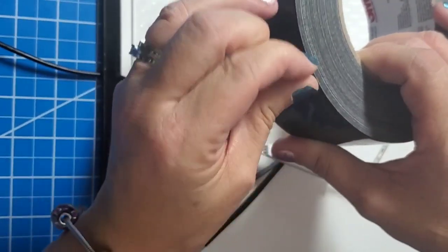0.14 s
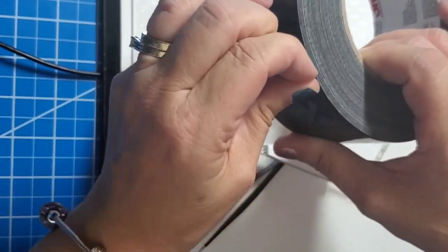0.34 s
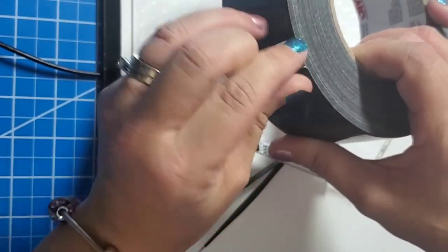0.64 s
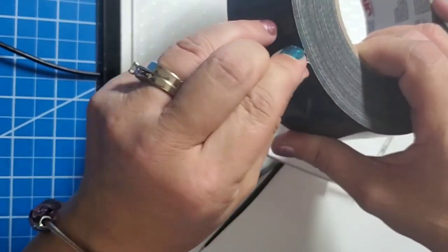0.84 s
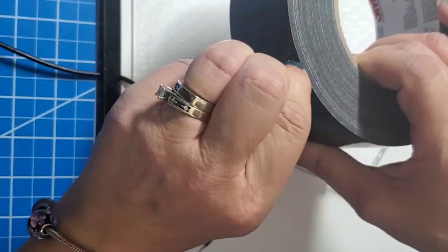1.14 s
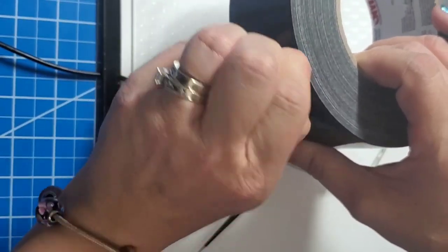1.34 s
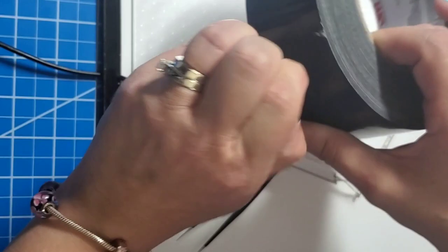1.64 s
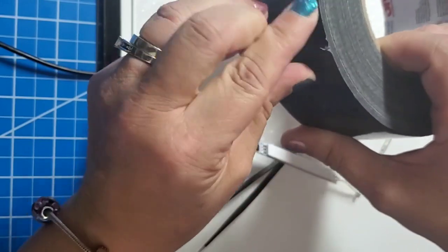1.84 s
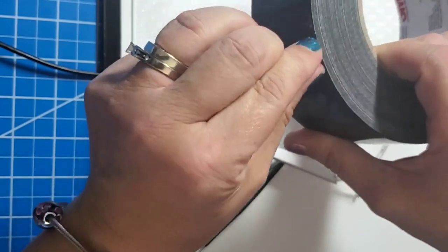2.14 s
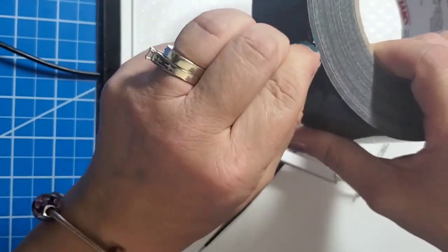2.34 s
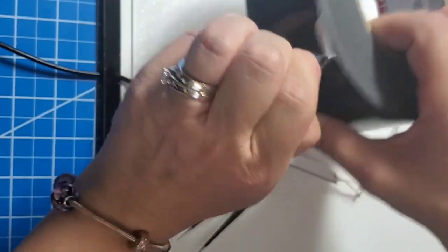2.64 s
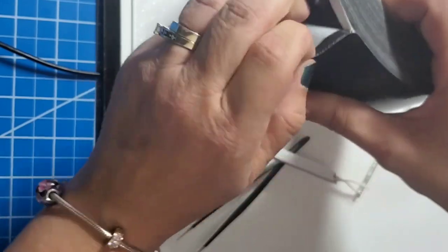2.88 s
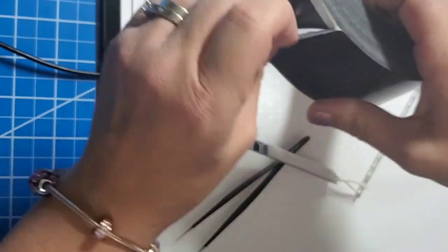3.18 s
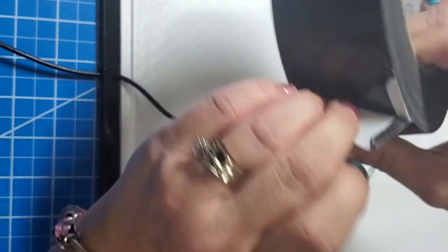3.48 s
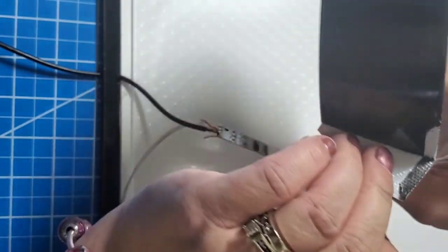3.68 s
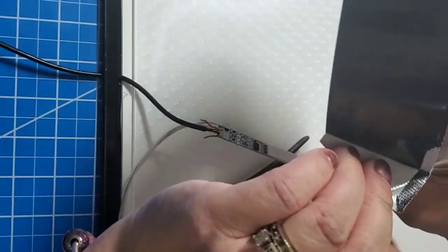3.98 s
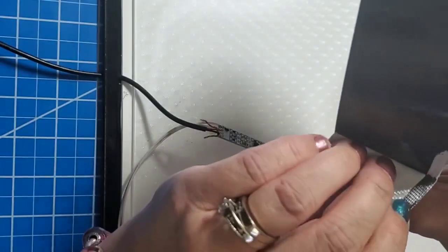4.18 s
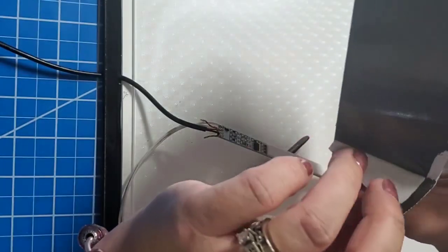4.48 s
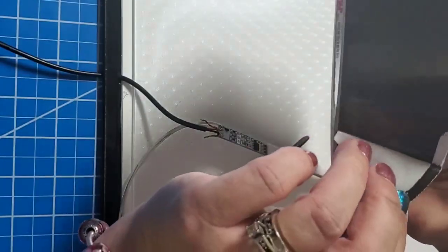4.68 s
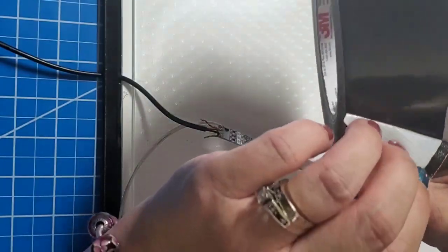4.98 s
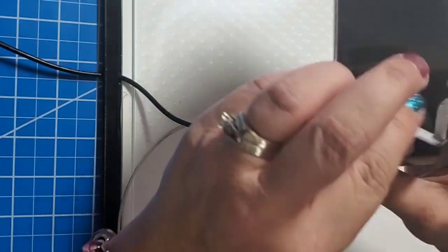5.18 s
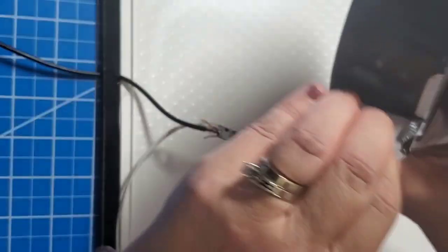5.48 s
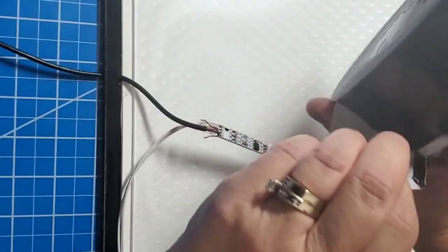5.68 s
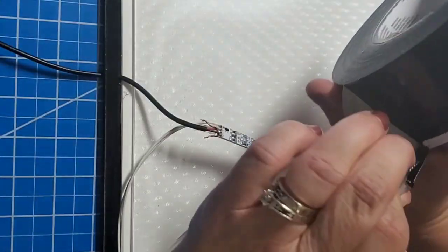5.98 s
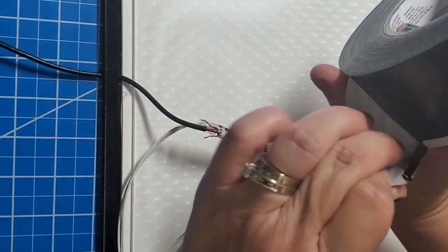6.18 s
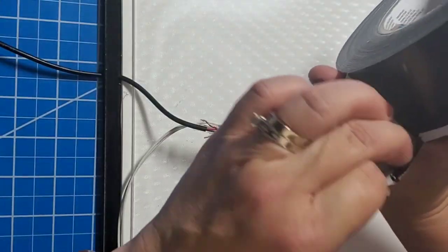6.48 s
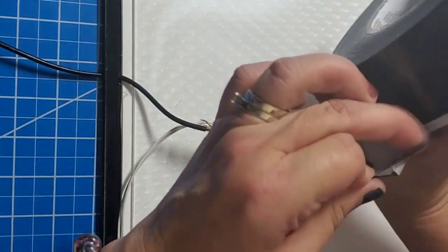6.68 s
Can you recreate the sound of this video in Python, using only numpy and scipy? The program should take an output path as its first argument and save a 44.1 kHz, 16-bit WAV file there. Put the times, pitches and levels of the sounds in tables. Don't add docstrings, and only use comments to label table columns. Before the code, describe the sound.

A small quiet room, heard close up, with soft air noise and a very faint far motor hum. At 0.1 s skin touches the tape backing with a light hiss, then a slow, almost inaudible rub. Around 1.6 s there is a quick swipe with tiny nail ticks and a dull desk bump. From 2.55 s picking clicks grow into a short crackling tear at 2.7 to 2.8 s. Then it is nearly quiet: faint brushes, a very soft run of glue ticks at 3.6 to 4.1 s, small clicks at 4.2 and 4.5 s, low hand bumps. Light picks from 5.1 s lead to the loud bright rip at 5.48 to 5.55 s. A weak creak at 5.7 s, a hard snap at 5.87 to 5.91 s and a small tug at 6.0 s follow. Sharp tugs crack at 6.3, 6.54 and 6.75 s, each with a brief room tail.

```python
import sys
import numpy as np
from scipy import signal
from scipy.io import wavfile
from scipy.ndimage import map_coordinates

SR = 44100
rng = np.random.default_rng(int(sys.argv[2]) if len(sys.argv) > 2 else 0)


def output_pcm(signal):
    pcm = np.clip(np.atleast_2d(signal).T, -1, 1) * 32767
    wavfile.write(sys.argv[1], SR, np.round(pcm).astype(np.int16))


def level_to_linear(level):
    exponent = np.asarray(level, float) / 20
    return 10 ** exponent


N = 300938


def rms_one(x):
    return x / np.sqrt(np.mean(x ** 2) + 1e-20)


def in_time(spans, fade_s):
    t = np.arange(N) / SR
    s, level_db, *columns = np.transpose(np.concatenate(spans))
    gate = 0
    for rows in spans:
        to_edge_s = np.minimum(t - rows[0][0], rows[-1][0] - t)
        gate = gate + np.clip(to_edge_s / fade_s, 0, 1)
    return [gate * level_to_linear(np.interp(t, s, level_db))] + [np.interp(t, s, c) for c in columns]


def at_hz(points, hz):
    table_hz, values = np.transpose(points)
    return np.interp(np.log(hz), np.log(np.maximum(table_hz, 1)), values)


def drift(rate_hz):
    knots = rng.standard_normal(int(N / SR * rate_hz * 2) + 3)
    return map_coordinates(knots, [np.linspace(0, len(knots) - 1, N)], order=3)


def band(x, low_hz, high_hz):
    sos = signal.butter(2, [low_hz, min(high_hz, 0.45 * SR)], "band", fs=SR, output="sos")
    return signal.sosfilt(sos, x)


def resonance(x, hz, width_hz):
    r = np.exp(-np.pi * width_hz / SR)
    poles = [1, -2 * r * np.cos(2 * np.pi * hz / SR), r * r]
    return signal.lfilter([(1 - r * r) / 2, 0, (r * r - 1) / 2], poles, x)


def body(x, modes, low_hz, high_hz, broad_db):
    click = np.arange(4096) == 0
    response = level_to_linear(broad_db) * click
    for hz, width_hz, level_db in modes:
        response = response + level_to_linear(level_db) * resonance(click, hz, width_hz)
    response = band(band(response, low_hz, high_hz), low_hz, high_hz)
    unit_energy = rms_one(response) / 64
    return signal.oaconvolve(x, unit_energy[None], axes=-1)[:, :N]


def releases(per_s, spread_db, alike):
    sizes_db = spread_db * np.minimum(rng.exponential(1, (4, N)), 4)
    sizes = level_to_linear(sizes_db) * rng.choice([-1, 1], (4, N))
    shared, *own = sizes * (rng.random((4, N)) < per_s / SR)
    alike = np.clip(alike, 0, 1)
    return rms_one(np.sqrt(alike) * shared + np.sqrt(1 - alike) * np.array(own))


def floor():
    # frequency in Hz, level in dB per Hz.
    spectrum = [(20, -26), (45, -17.5), (90, -11.5), (150, -14.5), (190, -18.5), (300, -25.5), (500, -29),
                (900, -38), (1500, -37), (3000, -39.5), (4700, -41.5), (6500, -50.5), (10500, -43.5),
                (15500, -52)]
    # frequency in Hz, left-right likeness from 0 to 1.
    likeness = [(60, 0.38), (250, 0.67), (700, 0.7), (2000, 0.046), (8000, 0.039)]
    # frequency in Hz, left minus right in dB.
    leaning = [(60, 6.5), (380, 0.5), (2380, -1), (15000, -0.5)]
    # time in seconds, level in dB.
    swell = [(.6, 4), (.9, -2.5), (1.3, 5), (1.699, -0.5), (2.3, -1), (3.301, 0.5), (3.8, -4), (4.4, 1.5),
             (5, -2), (6.2, -2)]
    out, edges_hz = 0, 22 * 2 ** np.arange(0, 9.8, 0.5)
    white = rng.standard_normal((2, 2, N))
    swell_db = np.interp(np.arange(N) / SR, *np.transpose(swell))
    for k, (low_hz, high_hz) in enumerate(zip(edges_hz, edges_hz[1:])):
        mid, side = band(white[k % 2], low_hz, high_hz)
        hz = np.sqrt(low_hz * high_hz)
        alike = np.clip(at_hz(likeness, hz), -1, 1)
        lean = level_to_linear(at_hz(leaning, hz) / 2 * np.array([[1], [-1]]))
        gain = level_to_linear(at_hz(spectrum, hz) + swell_db * (250 < hz < 2000))
        pair = np.sqrt(1 + alike) * mid + np.sqrt(1 - alike) * side * [[1], [-1]]
        out = out + gain * lean * pair
    return level_to_linear(-64 - 9.5) * rms_one(out)


def hum():
    # frequency in Hz, level in dB rms.
    lines = [(75.4, -74), (123.8, -76.5), (150.7, -75), (197, -88), (270, -90)]
    t, out = np.arange(N) / SR, 0
    for hz, db in lines:
        waver_db = 2 * drift(3)
        tone = np.sin(2 * np.pi * (hz * t + rng.random()))
        out = out + np.sqrt(2) * level_to_linear(db + waver_db) * tone
    return out


def bumps():
    # centre in seconds, level in dB, half length in seconds.
    shifts = [(0.197, -66.5, 0.064), (0.925, -73, 0.089), (1.249, -64, 0.09), (1.71, -59, 0.03),
              (2.326, -63, 0.078), (2.792, -62.5, 0.037), (3.05, -70, 0.26), (3.95, -75.5, .1),
              (3.48, -70, .07), (4.359, -71, .06), (4.75, -63.5, 0.041), (5.113, -62.5, 0.084),
              (5.28, -70.5, 0.081), (5.55, -65, .07), (6.29, -67, 0.093), (6.604, -63.5, 0.15)]
    t, gain = np.arange(N) / SR, 0
    for s, db, half_s in shifts:
        gain = gain + level_to_linear(db) * np.exp(-((t - s) / half_s) ** 2)
    mode_hz = 61 + 2.0 * drift(4.9)
    mode = level_to_linear(1.5 + 1.4 * drift(6.8)) * np.sin(2 * np.pi * np.cumsum(mode_hz) / SR)
    rumble = rms_one(band(band(rng.standard_normal(N), 36, 160), 36, 160))
    return gain * (mode + level_to_linear(-5.5) * rumble)


def room(x):
    # band centre in Hz, t60 in seconds, level in dB.
    decay = [(545, 0.22, -14.5), (1060, 0.18, -11), (2200, 0.17, -9), (4500, 0.18, -10), (8300, 0.2, -15.5),
             (13000, 0.16, -11.5)]
    t = np.arange(int(0.4 * SR)) / SR
    white, tail = rng.standard_normal((2, 2, len(t))), 0
    for k, (hz, t60_s, level_db) in enumerate(decay):
        dying = band(white[k % 2], hz / 1.34, hz * 1.42) * level_to_linear(-60 * t / t60_s)
        tail = tail + level_to_linear(level_db - 20) * dying
    tail = tail * np.clip((t - 0.002) / 0.0064, 0, 1)
    return signal.oaconvolve(x[None], tail, axes=-1)[:, :N]


def rubbing():
    # start in seconds, rise in seconds, fall in seconds, top level in dB, brightness in relative dB.
    strokes = [
        (0.123, 0.013, 0.13, -71, 4.5),
        (.45, 0.46, .75, -79, 1),
        (1.614, 0.013, 0.18, -67.5, 2),
        (1.78, 0.15, 0.19, -76.5, 6.5),
        (2.52, 0.079, 0.25, -73, 6.5),
        (2.99, 0.0087, 0.13, -78, 3.5),
        (3.1, .01, 0.22, -83.5, 10),
        (3.62, 0.34, 0.32, -82.5, 12),
        (4.19, 0.016, 0.43, -86, 7),
        (5.081, 0.1, 0.24, -90, 16.5),
    ]
    t, gain, bright = np.arange(0, N, 32) / SR, 0, 0
    for s, rise_s, fall_s, top_db, bright_db in strokes:
        share = np.interp(t, [s, s + rise_s, s + rise_s + fall_s], [0, 1, 0])
        stroke = np.minimum(8 * share, 1) * level_to_linear(top_db - 15 * (1.5 - share))
        gain = gain + stroke
        bright = bright + stroke * level_to_linear(bright_db)
    gain, bright = (np.interp(np.arange(N) / SR, t, slow) for slow in (gain, bright))
    hiss = releases(per_s=2800, spread_db=2.5, alike=0.4) * level_to_linear(-0.5 + 1.2 * drift(36))
    grains = hiss + level_to_linear(-24) * releases(per_s=150, spread_db=2.5, alike=0.58)
    return np.array([grains * gain, grains * gain * level_to_linear(-25), grains * gain * level_to_linear(-10), grains * bright])


def peeling():
    # time in seconds, level in dB.
    pulls = [
        [(2.69, -44.5), (2.717, -31), (2.745, -26.5), (2.8, -49.5)],
        [(5.484, -31.5), (5.528, -27.5), (5.55, -35.5)],
        [(5.72, -42.5), (5.73, -50), (5.79, -63)],
        [(5.812, -79), (5.86, -56), (5.865, -34)],
        [(5.873, -38), (5.883, -38.5), (5.92, -46)],
        [(5.985, -64), (6.017, -40), (6.04, -77.5)],
        [(6.313, -37), (6.345, -38)],
        [(6.752, -28), (6.76, -48), (6.79, -36.5)],
    ]
    # roll core, flap, fibre crack, all in relative dB.
    grips = [(-15, -6, 2.5), (-8, -6.5, 2), (1.5, 3, -0.5), (-1, -9.5, 0), (-5, -18, 3), (-3, -9.5, -5.5),
             (-14, -8, 4), (-7, -4.5, -6)]
    core_follows, flap_follows = 0.65, 0.3
    spans = []
    for rows, (core_db, flap_db, fibre_db) in zip(pulls, grips):
        top_db = max(db for s, db in rows)
        spans.append([(s, db, core_db + core_follows * (db - top_db),
                       flap_db + flap_follows * (db - top_db), fibre_db) for s, db in rows])
    gain, core_db, flap_db, fibre_db = in_time(spans, fade_s=0.0062)
    threads = releases(per_s=7000, spread_db=4.0, alike=0.37) * level_to_linear(-3.0 + 2.8 * drift(200))
    return np.array([gain * threads * level_to_linear(rel_db) for rel_db in (0, core_db, flap_db, fibre_db)])


def creeps():
    # start in seconds, length in seconds, ticks per second, top level in dB, pitch in Hz.
    runs = [
        (3.59, 0.13, 30., -82, 6500),
        (3.719, .13, 134, -74.5, 6200),
        (3.859, 0.14, 162, -71, 6060),
        (4.021, .08, 40., -74, 5950),
        (6.212, 0.085, 150, -59, 4030),
    ]
    core_db, flap_db, spread_db, arch_db = -33, -26, 3.0, 4.5
    rows = []
    for s, length_s, per_s, top_db, hz in runs:
        draws = rng.standard_normal((60, 3))
        at_s = np.cumsum(np.exp(0.5 * draws[:, 0])) / per_s
        level_db = top_db - arch_db * (2 * at_s / length_s - 1.3) ** 2 + spread_db * draws[:, 1]
        for a, db, d in zip(at_s, level_db, draws[:, 2]):
            if a < length_s:
                rows.append((s + a, db, core_db, flap_db, hz * np.exp(0.16 * d)))
    return rows


def snaps():
    # time in seconds, sheet level in dB, roll core in relative dB, flap in relative dB,
    # pitch of the loose sheet in Hz.
    picks = [(1.6168, -65.5, -9, -14, 5270), (1.6296, -56.5, -25, -25, 6630), (2.5662, -57, -17, -12, 3470),
             (2.6037, -63.5, -20, -19, 7800), (2.641, -46.5, -21.5, -20, 6850),
             (2.6795, -43.5, -24.5, -15, 4537), (2.9972, -65, -12, -4, 4180),
             (3.1075, -71, -13.5, -0.5, 7550), (3.1897, -70.5, 3.5, 13.5, 5000),
             (4.1671, -51, -25.5, -5, 5000), (4.2076, -60.5, -22.5, -5, 5600),
             (4.434, -71.5, -18.5, 5.5, 2910), (4.539, -50, -3.5, -3.5, 5100), (5.1267, -58.5, -5, 2, 3520),
             (5.1918, -59.5, -1, -7, 4070), (5.1947, -62, 6.5, 8, 7635), (5.2451, -58, 0, -25, 5000),
             (5.3403, -71, -19, -5, 3400), (5.4277, -77.5, -18, -10.5, 7120),
             (5.4466, -73.5, -20, -16, 7580), (5.47, -68.5, -25, -25, 7500), (1.654, -67, -13, -12, 4800),
             (6.188, -69, -19.5, -15, 5500)]
    tears = [(2.6905, -40.5, -35.5, -20.5, 6600), (2.7143, -37.5, -20.5, -5, 6600),
             (2.7445, -32.5, -29, 3.5, 5626), (2.7598, -39, -23, -0.5, 4000),
             (5.4793, -20, -21.5, -18, 7128), (5.4825, -22, -13, -10, 6300), (5.4955, -22.5, -8, -8, 6300),
             (5.5033, -19, -6, -6.5, 5000), (5.508, -20, -3.5, -4, 4497), (5.5111, -17, -15.5, -4.5, 3550),
             (5.5272, -24.5, -4, -31, 3800), (5.5307, -26, -5, -17.5, 3970),
             (5.5396, -27.5, -30.5, -10, 4300), (5.7156, -36.5, -1, -19, 4800),
             (5.8424, -49.5, -6, -2.5, 3700), (5.8568, -55.5, -10, -24, 6780),
             (5.8689, -17, -15.5, -17, 3420), (5.8708, -18.5, -8.5, -7, 4074),
             (5.895, -42, -3.5, -16, 3700), (5.9057, -37, 3, -11, 5640), (5.909, -23.5, -25.5, -11, 6490),
             (5.988, -47.5, -1.5, -1, 3400), (6.001, -42, -9, -17, 4974), (6.0115, -41, -7.5, -2, 3700)]
    tugs = [(6.218, -55, -35, -24.5, 3700), (6.2232, -45, -44, -26, 3700), (6.2308, -46, -41.5, -25, 3820),
            (6.2546, -53, -40.5, -22, 4800), (6.2611, -43, -52, -21, 3860), (6.2931, -40.5, -47, -22, 3870),
            (6.3009, -45.5, -13.5, -29.5, 4848), (6.31, -18, -20.5, -4, 3420),
            (6.3103, -25, -26, -10, 4620), (6.3202, -29.5, -38, -18, 4300), (6.334, -20, -20.5, 0, 5000),
            (6.4627, -44.5, -35, -34.5, 5000), (6.4752, -50, -30, -19, 4100), (6.5108, -42, -38, -23, 5230),
            (6.5135, -32.5, -33, -31, 5000), (6.542, -23.5, -18, -15, 3700),
            (6.5493, -43.5, 1.5, -29.5, 3426), (6.659, -40, -10, -11.5, 3980), (6.7208, -43, -9, -10, 4250),
            (6.723, -36, -10.5, -14, 5260), (6.7315, -46, -2, -9, 4000), (6.7443, -36, -12, -22, 5000),
            (6.7494, -22.5, -14, -14, 5400)]
    # relative dB at 5 kHz sheet pitch, dB per octave above; a tighter patch cracks brighter
    kinds = (picks, 0, 17), (tears, -2, 4.3), (tugs, -3, 14), (creeps(), 5.6, 10.4)
    threads = releases(per_s=11000, spread_db=1.0, alike=0.47)
    force, n = np.zeros((4, 3, N)), np.arange(256)
    for rows, crack_db, db_per_oct in kinds:
        for s, sheet_db, core_db, flap_db, sheet_hz in rows:
            fibre_db = crack_db + db_per_oct * np.log2(sheet_hz / 5000)
            at = round(s * SR)
            span = np.clip(3.5 + 0.027 * sheet_db, 1, 4) * SR / 1000
            swell = np.minimum((n + 1) / 10, 1) * np.exp(-2.5 * n / span)
            burst = threads[:, at:at + len(n)] * swell
            burst[2] = n == 0
            energy = np.sum(burst ** 2, axis=1, keepdims=True)
            burst = burst * np.sqrt(span / (energy + 1e-9))
            patch = resonance(burst, sheet_hz, 0.13 * sheet_hz)
            ringing = 0.71 * burst + np.array([[1.3], [1.3], [0.6]]) * patch
            gains = level_to_linear(sheet_db + np.array([0, core_db, flap_db, fibre_db]))
            force[:, :, at:at + len(n)] += gains[:, None, None] * np.array([ringing, burst, burst, burst])
    return force


def tape(force):
    # frequency in Hz, width in Hz, level in dB.
    core_modes = [(660, 38, -5), (800, 70, -1.5), (993, 380, -6)]
    flap_modes = [(1982, 180, -0.5), (2290, 170, -2.5), (3250, 280, -5)]
    sheet_modes = [(3700, 1100, 1), (5000, 460, -8), (6300, 2200, -4.5)]
    fibre_modes = [(8000, 2800, 0.87), (10600, 3200, -0.7), (15500, 740, -2)]
    sheet, core, flap, fibre = force
    out = body(sheet, sheet_modes, 2500, 8235, broad_db=0.5)
    out = out + body(core, core_modes, 380, 1433, broad_db=-16.0)
    out = out + body(flap, flap_modes, 1400, 3234, broad_db=-8.5)
    out = out - body(fibre, fibre_modes, 6000, 15600, broad_db=2.5)
    return out + level_to_linear(-14.5) * band(sheet + core, 140, 300)


def scene():
    port_lag_samples, low_lean_db = 7, -2
    left, right, around = tape(snaps() + peeling() + rubbing())
    near = np.array([level_to_linear(-0.4) * left, level_to_linear(0.86) * right])
    desk_echo = level_to_linear(-22.0) * np.roll(near, round(0.0022 * SR), axis=1)
    near = near + desk_echo + room(around)
    apart = signal.sosfilt(signal.butter(1, 2600, fs=SR, output="sos"), near[0] - near[1])
    near = near - 0.5 * apart * [[1], [-1]]
    lows = signal.sosfilt(signal.butter(1, 3000, fs=SR, output="sos"), near)
    near = near + lows * (level_to_linear(low_lean_db / 2 * np.array([[1], [-1]])) - 1)
    left, right = near + floor() + (hum() + bumps()) * level_to_linear([[1.6], [-1.6]])
    return np.array([np.roll(left, port_lag_samples), right])


def band_limit(x):
    return signal.sosfilt(signal.butter(12, 16860, fs=SR, output="sos"), x)


def record(dry):
    rounded = 0.96 * np.tanh(dry / 0.88)
    top_cut = signal.cheby2(8, 30, 16300, fs=SR, output="sos")
    return band_limit(signal.sosfilt(top_cut, rounded))


dry = scene()
out = record(dry)
output_pcm(out)
```